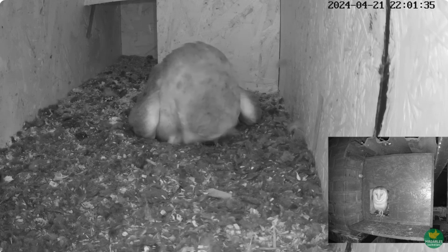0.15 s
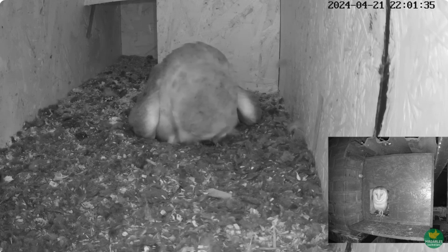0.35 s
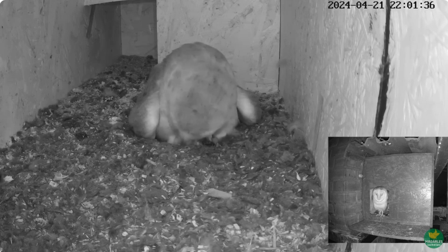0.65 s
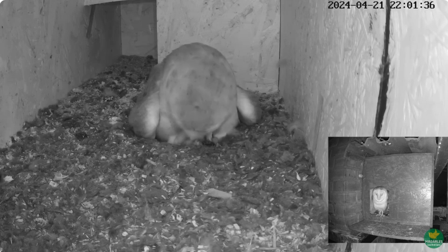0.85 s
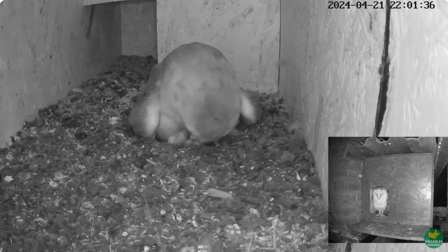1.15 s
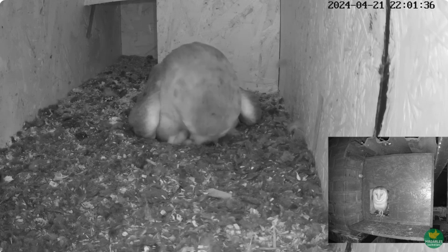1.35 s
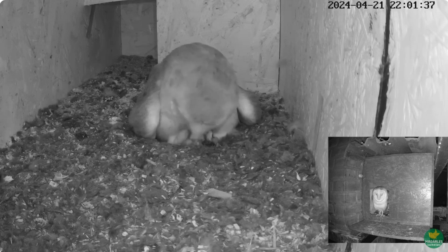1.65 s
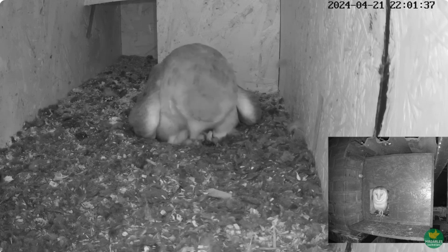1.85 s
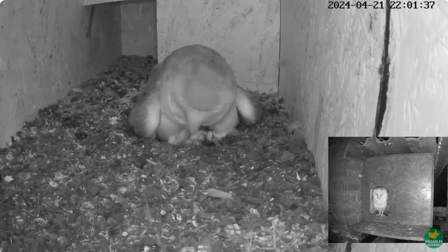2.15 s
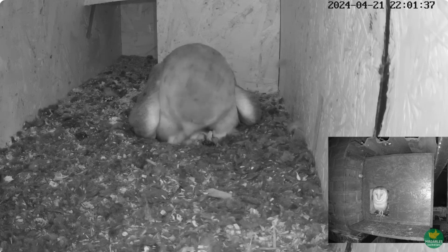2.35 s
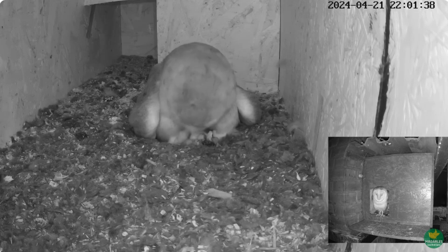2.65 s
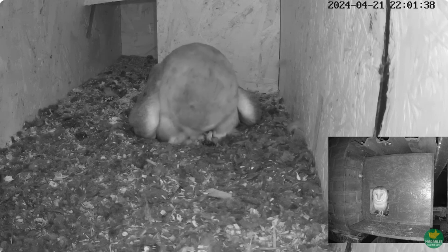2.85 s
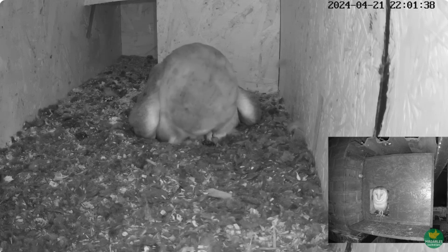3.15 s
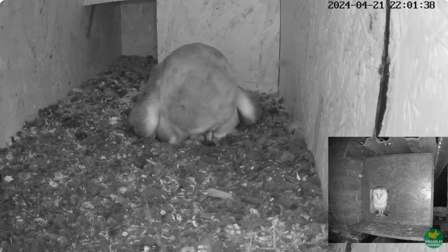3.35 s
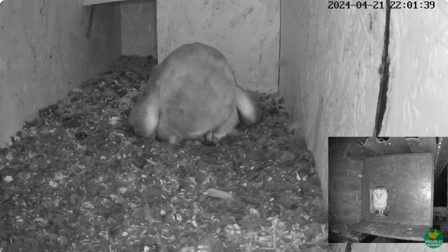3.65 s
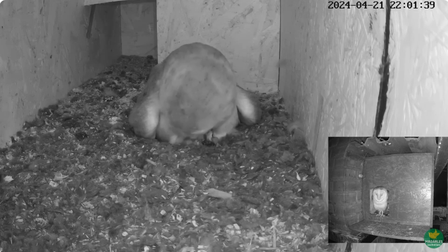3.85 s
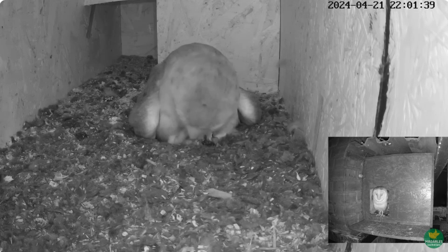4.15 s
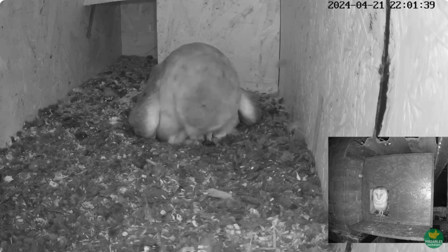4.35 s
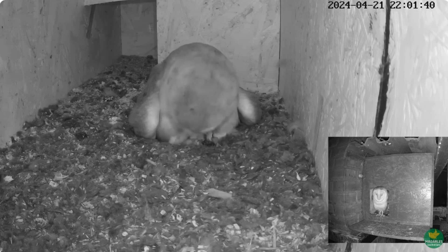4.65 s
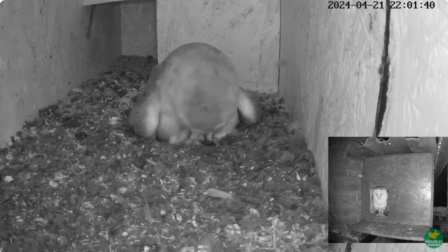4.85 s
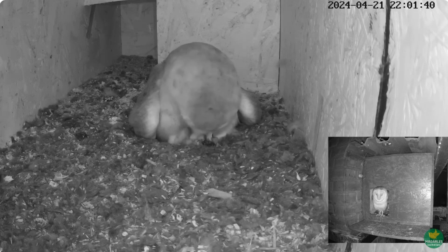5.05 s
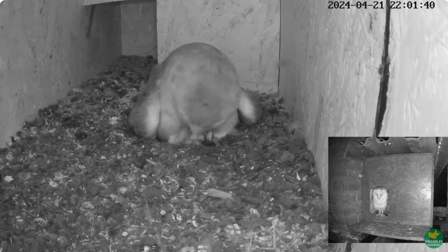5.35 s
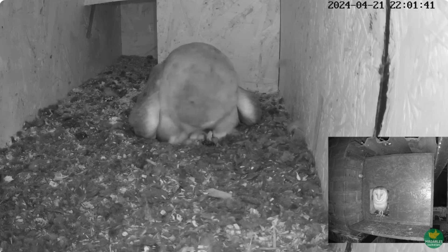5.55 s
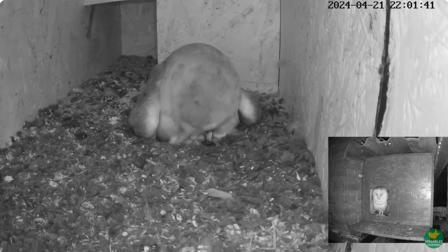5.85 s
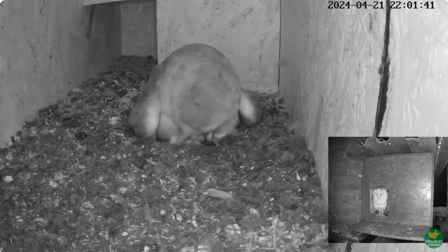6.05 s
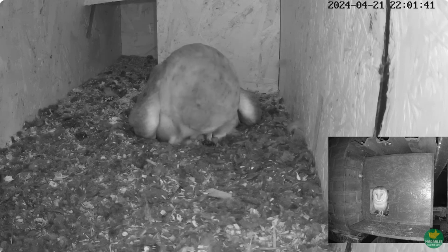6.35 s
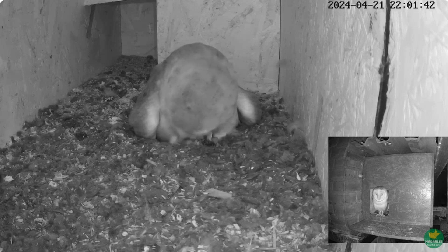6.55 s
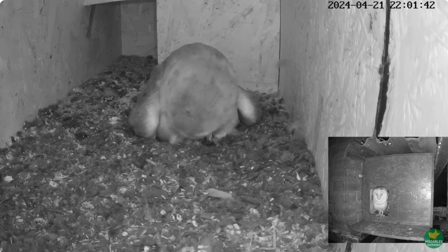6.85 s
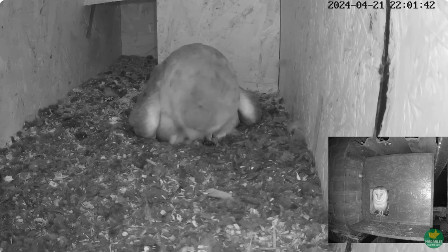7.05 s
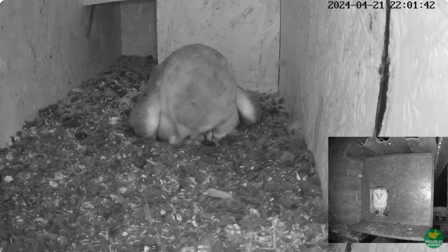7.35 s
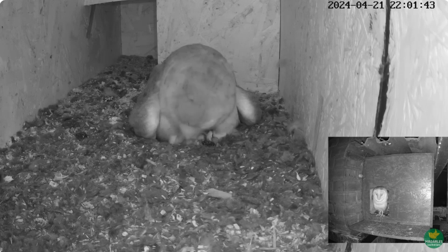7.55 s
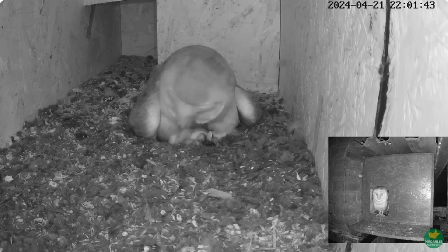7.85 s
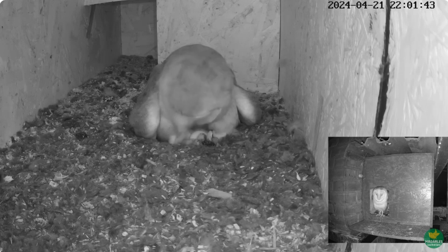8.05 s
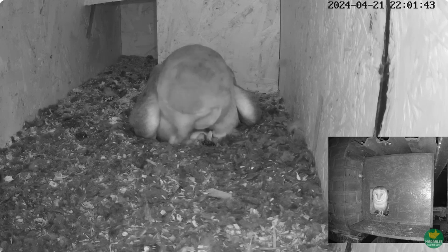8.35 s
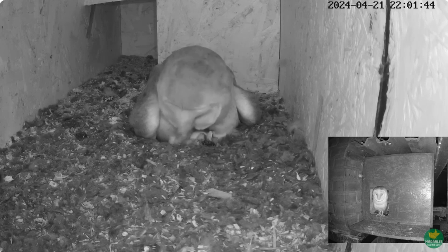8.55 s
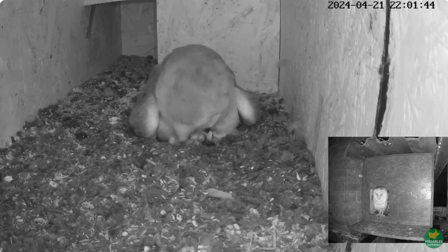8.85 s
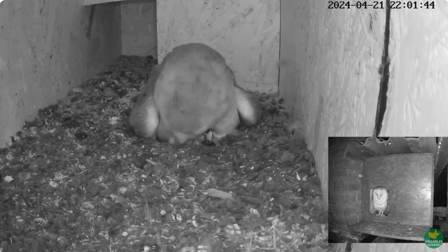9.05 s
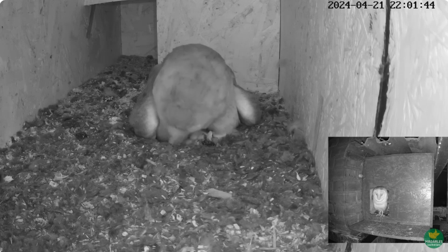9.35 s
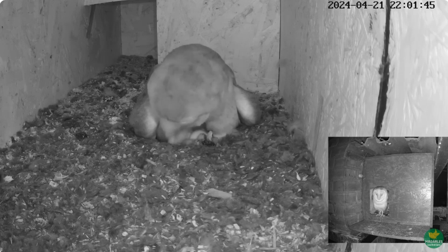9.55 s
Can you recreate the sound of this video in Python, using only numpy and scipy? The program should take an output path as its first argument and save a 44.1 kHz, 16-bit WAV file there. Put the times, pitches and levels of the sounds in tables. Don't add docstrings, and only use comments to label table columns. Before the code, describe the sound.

A barn owl calls repeatedly with dry, scratchy screeching hisses, each under half a second, coloured by the tight woody box with a very short tail. Thin squeaks edge many calls. A couple of faint peeps and a soft knock occur early on; far vehicles pass quietly beneath constant microphone hiss, slightly stronger in the later part.

```python
import sys
import numpy as np
from scipy import signal
from scipy.fft import rfft, irfft
from scipy.io import wavfile
from scipy.ndimage import uniform_filter1d

SR = 44100
rng = np.random.default_rng(int(sys.argv[2]) if len(sys.argv) > 2 else 0)


def persist_wave(psi):
    counts = np.round(np.clip(psi, -1, 1) * 32767).astype(np.int16)
    wavfile.write(sys.argv[1], SR, np.atleast_2d(counts).T)


def invert_db(x):
    u = np.asarray(x, float) / 20
    return 10 ** u


N = 428652

# time_s, effort_db, gape (of the beak: -1 nearly shut, 0 usual, 1 wide)
RASPS = [
    [(.287, -53, -.3), (.305, -40, 0.01), (.36, -33, 0.054), (.673, -30, -0.37), (.721, -36, -0.46),
     (.75, -64, -.3)],
    [(2.142, -50, -1.1), (2.165, -38, -1.3), (2.21, -37, -0.099), (2.37, -31.5, 0.55), (2.44, -34.5, 0.33),
     (2.485, -49.5, 0.77)],
    [(3.452, -39.5, -0.43), (3.6, -33.5, 0.1), (3.67, -31, -.2), (3.72, -34, 0.98), (3.75, -36.5, 1.05),
     (3.785, -41, .2)],
    [(4.925, -56, -0.04), (4.957, -43, -.4), (5.007, -37, -0.84), (5.063, -36, 0.15), (5.345, -34, 0.097),
     (5.385, -49, .1)],
    [(6.54, -44.5, -1), (6.615, -36, 0.75), (6.72, -34, -0.47), (6.88, -33, 0.34), (6.918, -36, .9),
     (6.945, -43, 0.26)],
    [(7.795, -43, -1.4), (7.85, -39.5, -0.57), (7.94, -36, 0.031), (8.13, -35.5, 0.037),
     (8.2, -37.5, -0.094), (8.24, -52.5, 0.22)],
    [(9.54, -50.5, .3), (9.6, -39, -0.16), (9.64, -35, -0.0073), (9.72, -33.5, 0.14)],
]


def evened(x):
    return x / np.sqrt(np.mean(x ** 2) + 1e-20)


def add(mix, start_s, sound):
    part = mix[round(start_s * SR):][:len(sound)]
    part += sound[:len(part)]


def coloured(points):
    hz = np.fft.rfftfreq(N, 1 / SR)
    point_hz, point_db = np.transpose(points)
    gain = invert_db(np.interp(np.log(hz + 1), np.log(point_hz), point_db, left=-99, right=-99))
    return evened(irfft(rfft(rng.standard_normal(N)) * gain, N))


def fuzzy(hz, width_hz):
    r = np.exp(-np.pi * width_hz / SR)
    slow = signal.lfilter([1], np.convolve([1, -r], [1, -r]), [1, 1j] @ rng.standard_normal((2, N)))
    carrier = np.exp(2j * np.pi * np.cumsum(hz * np.ones(N)) / SR)
    return evened((slow * carrier).real)


def microphone_hiss():
    # pitch_hz, level_db (per Hz)
    hiss_spectrum = [(2290, -5.5), (3900, -2), (4190, -6.5), (4780, -5.5), (8040, -2.5), (13000, -7.5),
                     (13500, -4)]
    return invert_db(-58) * coloured(hiss_spectrum)


def night_air():
    # pitch_hz, level_db (per Hz)
    night_spectrum = [(15, -74), (25, -69), (59, -23), (85, -19.5), (108, -13), (146, -2), (166, -4.5),
                      (225, 2), (385, -11), (556, -9), (1040, -17), (1370, -10.5), (1500, -12), (3250, -18),
                      (4300, -30.5), (5590, -32), (9460, -120)]
    return invert_db(-50.5) * coloured(night_spectrum)


def far_engine():
    # time_s, pitch_hz, level_db
    engine_course = [(0, 128.9, -66), (1.14, 118.7, -67), (3.1, 115.8, -65), (5.2, 111.3, -66),
                     (7, 112.2, -63), (8.2, 107.6, -63.5), (9.72, 110.2, -71.5)]
    time_s, pitch_hz, level_db = np.transpose(engine_course)
    t = np.arange(N) / SR
    hz = np.interp(t, time_s, pitch_hz)
    hum = np.sqrt(2) * np.sin(2 * np.pi * np.cumsum(hz) / SR)
    hum += .35 * fuzzy(hz, 6) + .9 * fuzzy(2 * hz, 10)
    return invert_db(np.interp(t, time_s, level_db)) * hum


def passing_vehicles():
    # nearest_s, half_length_s, swell_db
    passes = [
        (.5, 0.25, -58),
        (3.404, 1, -64),
        (6.405, 0.7, -52.5),
        (8.385, .6, -51.5),
    ]
    # pitch_hz, width_hz
    traffic_tones = [(56, 6), (340, 111), (1400, 80)]
    drone_tone, tyre_tone, whistle_tone = traffic_tones
    t = np.arange(N) / SR
    power = invert_db(-62.5) ** 2
    for nearest_s, half_s, swell_db in passes:
        power = power + invert_db(swell_db) ** 2 / (1 + ((t - nearest_s) / half_s) ** 2) ** 2
    tyres = np.sqrt(power)
    nearness = (1 + np.tanh((t - 7.0) / .6)) / 2
    out = invert_db(-89 + 11 * nearness) * fuzzy(*drone_tone)
    out += tyres * fuzzy(*tyre_tone)
    out += tyres * invert_db(-7.0) * fuzzy(680, 660)
    out += invert_db(-68.5) * fuzzy(*whistle_tone)
    out += invert_db(-66.0) * fuzzy(1640, 310)
    return out


def peeps_and_bumps():
    # start_s, length_s, from_hz, to_hz, peak_db
    glides = [
        (1.315, .06, 75, 62, -58),
        (2.405, .026, 210, 250, -42),
        (1.726, 0.041, 1110, 1220, -50),
        (1.827, 0.054, 1384, 1390, -48),
        (8.362, 0.029, 1450, 1530, -48),
    ]
    out = np.zeros(N)
    for start_s, length_s, from_hz, to_hz, peak_db in glides:
        hz = np.linspace(from_hz, to_hz, int(length_s * SR))
        add(out, start_s, invert_db(peak_db) * np.hanning(len(hz)) * np.sin(2 * np.pi * np.cumsum(hz) / SR))
    return out


def scatter(t60=.07, share_db=-4.5):
    t = np.arange(3000) / SR
    tail = np.diff(rng.standard_normal(len(t) + 1)) * invert_db(-60 * t / t60) * (t > .002)
    response = signal.unit_impulse(len(t)) + invert_db(share_db) * tail / np.linalg.norm(tail)
    return response / np.linalg.norm(response)


def box_ring(modes, between_db=-9.5, smooth_hz=1500):
    # pitch_hz, width_hz, depth (0-1)
    notches = [(4935, 340, 0), (6410, 100, 0.2), (7800, 180, 0.94), (8580, 87, 0.7), (10250, 200, 0.4)]
    hz = abs(np.fft.fftfreq(8192, 1 / SR))
    narrowest_hz = 12
    peaks = sum(invert_db(db) ** 2 / (1 + ((hz - f) / (narrowest_hz + w / 2)) ** 2) for f, w, db in modes)
    span = int(smooth_hz * len(hz) / SR)
    power = peaks / uniform_filter1d(peaks, span, mode="wrap") + invert_db(between_db) ** 2
    log_gain = np.log(power / uniform_filter1d(power, span, mode="wrap")) / 2
    for f, w, depth in notches:
        log_gain += np.log(1 - min(depth, .95) / (1 + ((hz - f) / (w / 2)) ** 2))
    return np.fft.ifft(np.exp(np.conj(signal.hilbert(log_gain)))).real[:4096]


def wall_echoes(voice, facing):
    # delay_ms, share
    walls = [(.43, -.015), (.69, 0.03), (.95, -0.082), (1.1, -0.027), (1.43, 0.021), (2.05, 0.052)]
    facing_ms = (0.886, 2.11)
    delay_ms, shares = np.transpose(walls + list(zip(facing_ms, facing)))
    lags = np.arange(128)[:, None] - delay_ms * SR / 1000
    return signal.oaconvolve(voice, signal.unit_impulse(len(lags)) + np.sinc(lags) @ shares)


def bump(hz, centre_hz, width_hz, steep):
    shape = 1 / (1 + (abs(hz - centre_hz) / width_hz) ** steep)
    return shape / shape.mean(0)


def membrane_slaps(n, slaps_per_s=3300, jitter=.7, uneven_db=3.0):
    late, size, sign = rng.random((3, 2400))
    at = ((np.arange(len(late)) + jitter * late) * SR / slaps_per_s).astype(int)
    strength = invert_db(-uneven_db * np.log(size + .12)) * np.sign(sign - .5)
    return evened(np.bincount(at, strength)[:n])


def rasp(rows, pose, facing):
    throat_hz, beak_start_hz, beak_end_hz, beak_over_db, air_over_db = pose
    s, effort_db, gape = np.transpose(rows)
    n = int((s[-1] - s[0]) * SR)
    hz, t, z = signal.stft(membrane_slaps(n), SR, nperseg=256, noverlap=192)
    hz = hz[:, None]
    effort_db, gape = np.interp(t + s[0], s, effort_db), np.interp(t + s[0], s, gape)
    throat_hz = throat_hz * (1 + 0.12 * np.minimum(gape, 0))
    beak_hz = np.linspace(beak_start_hz, beak_end_hz, len(t)) * (1 + 0.2 * gape)
    throat_db = effort_db - 4.5 * np.maximum(gape, 0)
    beak_db = effort_db + beak_over_db + 11 * gape
    air_db = effort_db + air_over_db + 11 * gape
    chest_db = -39.5 + 0.28 * (effort_db + 33.5)

    throat = bump(hz, throat_hz, 614, 2.84)
    chest = bump(hz, 1860, 1100, 3.85) + invert_db(-14.5) ** 2 * bump(hz, 1250, 150, 2.5)
    beak = bump(hz, beak_hz, 1450, 5.6)
    air = 0.89 * bump(hz, 4800, 3400, 0.79) + 0.086 * bump(hz, 12700, 700, 1.5)
    power = invert_db(throat_db) ** 2 * throat + invert_db(chest_db) ** 2 * chest
    power += invert_db(beak_db) ** 2 * beak + invert_db(air_db) ** 2 * air
    power *= 1 / (1 + (380 / (hz + 1)) ** 6.8) * (0.36 + 1 / (1 + (1180 / (hz + 1)) ** 7.2))
    voice = signal.istft(z * np.sqrt(power), SR, nperseg=256, noverlap=192)[1][:n]
    return wall_echoes(voice * signal.windows.tukey(len(voice), .07), facing)


def squeak(from_hz, to_hz, levels_db, shortest_s, s_per_khz, loudest, fade_db, overtone_fade_db,
           flutter_db=4.5, wobble=0.013, fourth_db=-15):
    length_s = shortest_s + s_per_khz * abs(to_hz - from_hz) / 1000
    u = np.linspace(0, 1, int(length_s * SR))
    hz = to_hz + (from_hz - to_hz) * (1 - u) ** 2.2
    drift = uniform_filter1d(uniform_filter1d(rng.standard_normal((5, 2600)), 70), 70)
    drift = evened(drift)[:, :len(u)]
    turns = np.cumsum(hz * (1 + wobble * drift[-1])) / SR
    first_db, second_db, third_db = levels_db
    away = (u - loudest) ** 2
    harmonics_db = [first_db + fade_db * away]
    for db in (second_db, third_db, third_db + fourth_db):
        harmonics_db.append(db + overtone_fade_db * away)
    note = np.zeros(len(u))
    for k, db in enumerate(harmonics_db):
        note += invert_db(db + flutter_db * drift[k]) * np.sin(2 * np.pi * (k + 1) * turns)
    return note * signal.windows.tukey(len(u), .35)


def squeaks():
    # start_s, from_hz, to_hz, first_harmonic_db, second_harmonic_db
    openers = [(2.130, 2000, 2540, -37.5, -53), (3.444, 2670, 2720, -44, -35.5),
               (4.927, 2390, 2740, -46, -59), (6.534, 2780, 2720, -40, -57), (7.781, 2260, 2540, -38, -48),
               (9.543, 2330, 2420, -44, -58)]
    # start_s, from_hz, to_hz, second_harmonic_db, third_harmonic_db
    closers = [(0.732, 2540, 2550, -58, -58), (2.474, 2580, 2480, -38, -41), (3.777, 3050, 2420, -40, -60),
               (5.381, 2460, 2290, -39.5, -40.5), (6.942, 2500, 2330, -39, -37)]
    out = np.zeros(N)
    for start_s, from_hz, to_hz, first_db, second_db in openers:
        add(out, start_s, squeak(from_hz, to_hz, (first_db, second_db, -61), shortest_s=.015, s_per_khz=.023,
                                 loudest=0, fade_db=4, overtone_fade_db=-12))
    for start_s, from_hz, to_hz, second_db, third_db in closers:
        first_db = -26.5 + .3 * second_db
        add(out, start_s, squeak(from_hz, to_hz, (first_db, second_db, third_db), shortest_s=.021,
                                 s_per_khz=.02, loudest=0.2, fade_db=-45, overtone_fade_db=-85))
    return out


def owl():
    # pitch_hz, width_hz, level_db
    box_low = [(1403, 47, -3), (1807, 53, 0.5), (2123, 11, -0.5), (2330, 12, 1), (2540, 6.3, 1),
               (2690, 8.3, 2.5), (2960, 380, -2), (3360, 290, 1), (3905, 47, 5), (4317, 18, 1),
               (4590, 50, 0.5)]
    box_high = [(5350, 260, -6.5), (5920, 210, 1.5), (6500, 110, 1), (7030, 55, -2), (7530, 110, -1.5),
                (7950, 93, -7), (8290, 60, -5.5), (8690, 93, 0), (9380, 120, -5), (9700, 60, -13),
                (10190, 240, -13.5), (11470, 250, -27), (12900, 420, -7)]
    # throat_hz, beak_start_hz, beak_end_hz, beak_over_effort_db, air_over_effort_db
    poses = [(3730, 7300, 6800, -9.5, -9), (3960, 5950, 5600, 0.5, -11.5), (4120, 5800, 6000, -7.5, -20),
             (3700, 8800, 8200, -0.9, 0.1), (3970, 6300, 6500, -8, -15.5), (3850, 9000, 6800, 4, -1),
             (3620, 7700, 7100, -2, -4)]
    facings = [(.18, -0.12), (0.18, -0.14), (.05, -0.16), (0.15, -0.08), (0.044, -0.042), (.19, -0.18),
               (0.033, -0.22)]
    # first_hz, second_hz, third_hz, level_db
    nearest_modes = [(6270, 6830, 8900, .5), (5940, 6970, 5100, 2), (6060, 6400, 4600, -1),
                     (5920, 8000, 3500, 4), (5870, 6100, 4650, -1), (5920, 3500, 8300, -0.5),
                     (5900, 3500, 7000, -2)]
    calls = np.zeros(N)
    for rows, pose, facing, (*near_hz, near_db) in zip(RASPS, poses, facings, nearest_modes):
        near = [(hz, 53, near_db) for hz in near_hz]
        ring = box_ring(box_low + box_high + near)
        add(calls, rows[0][0], signal.oaconvolve(rasp(rows, pose, facing), ring))
    calls += signal.oaconvolve(squeaks(), box_ring(box_low + box_high, between_db=0.0))[:N]
    return signal.oaconvolve(calls, scatter())[:N]


def stereo_flecks(mono, count=75):
    # time_s, low_hz, high_hz
    rasp_flecks = [(.541, 9000, 10500), (2.35, 6300, 7800), (5.16, 6900, 8500), (5.325, 13000, 13800),
                   (6.778, 4200, 5300), (7.86, 4700, 5800), (8.004, 4200, 6400), (9.703, 7600, 9200)]
    hz, t, z = signal.stft(mono, SR, nperseg=1024, noverlap=512)
    when, low = rng.random((count, 2)).T
    flecks = list(rasp_flecks)
    for s, low_hz in zip(when * t[-1], 4200 + 8000 * low):
        if not any(rows[0][0] - .05 < s < rows[-1][0] + .05 for rows in RASPS):
            flecks.append((s, low_hz, low_hz + 1600))
    mask = np.zeros(z.shape)
    for s, low_hz, high_hz in flecks:
        mask[np.ix_((hz > low_hz) & (hz < high_hz), abs(t - s) < .013)] = 1
    noise = abs(z) * np.exp(2j * np.pi * rng.random(z.shape))
    mid = signal.istft(z * (1 - .2 * mask), SR, nperseg=1024, noverlap=512)[1][:N]
    side = signal.istft(.9 * noise * mask, SR, nperseg=1024, noverlap=512)[1][:N]
    return np.array([mid + side, mid - side])


def scene():
    mono = microphone_hiss() + night_air() + far_engine() + passing_vehicles() + peeps_and_bumps() + owl()
    return np.array([mono, mono])


def low_pass(x):
    return signal.sosfilt(signal.butter(12, 13670, fs=SR, output="sos"), x)


def record(dry):
    ceiling = .3
    limited = ceiling * np.tanh(dry[0] / ceiling)
    limited = signal.sosfilt(signal.butter(2, 38, "high", fs=SR, output="sos"), limited)
    edge = signal.firwin(701, 13680, window=("kaiser", 9), fs=SR)
    roll_off = signal.firwin(61, 14300, fs=SR)
    mono = signal.oaconvolve(limited, np.convolve(edge, roll_off), "same")
    return low_pass(stereo_flecks(mono))


dry = scene()
out = record(dry)
persist_wave(out)
```